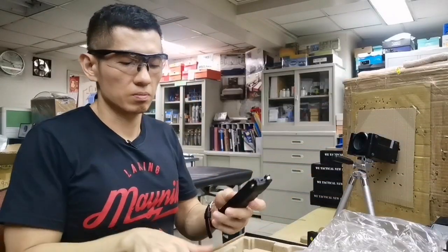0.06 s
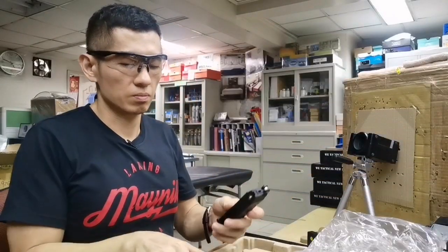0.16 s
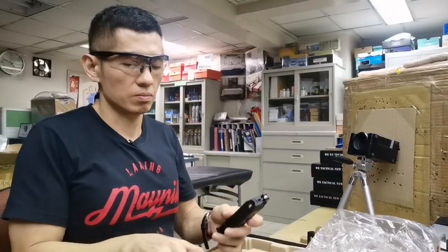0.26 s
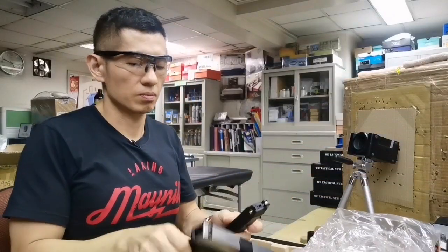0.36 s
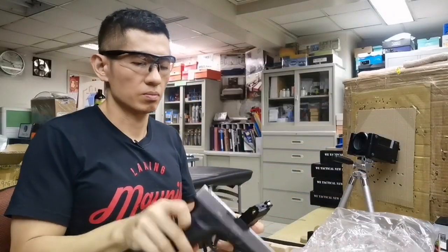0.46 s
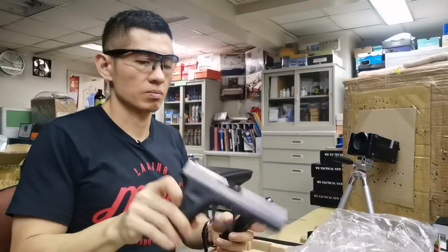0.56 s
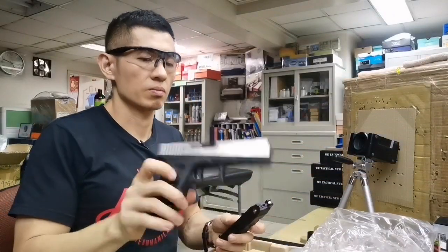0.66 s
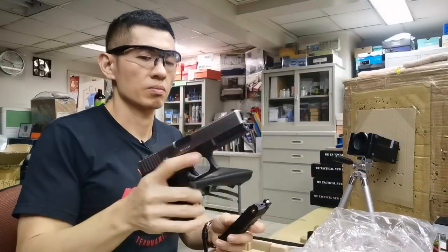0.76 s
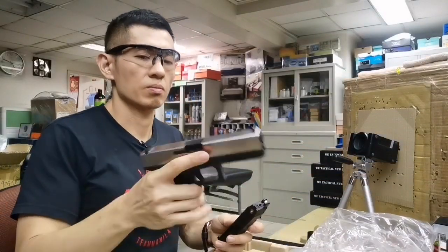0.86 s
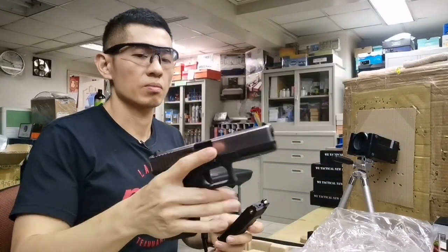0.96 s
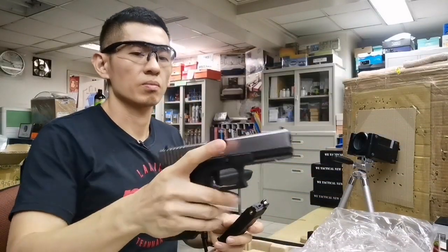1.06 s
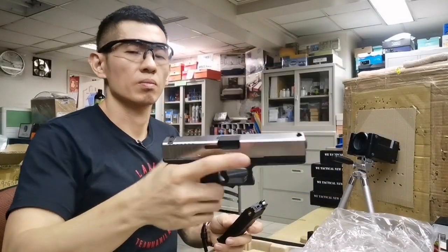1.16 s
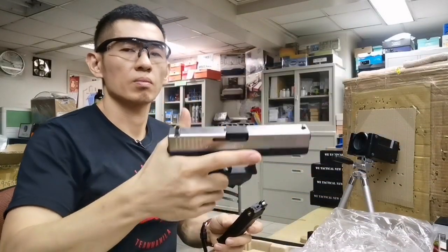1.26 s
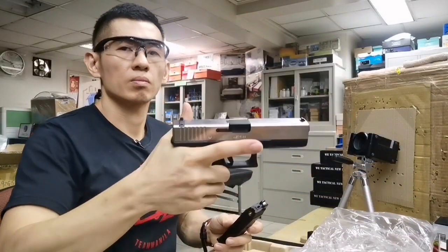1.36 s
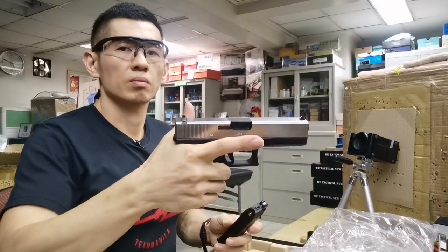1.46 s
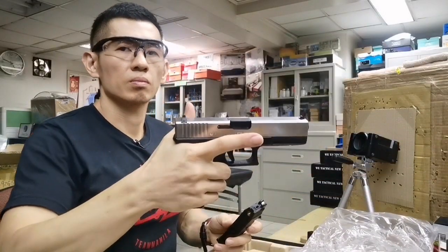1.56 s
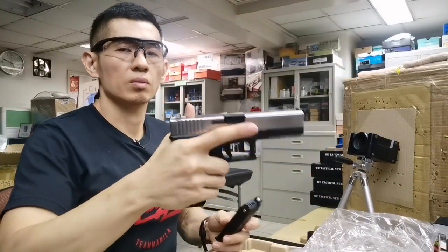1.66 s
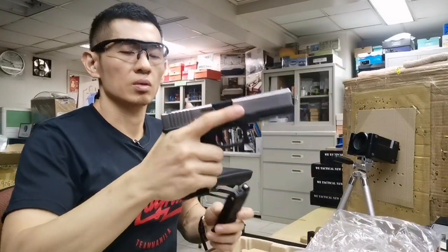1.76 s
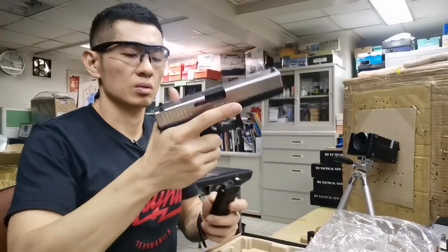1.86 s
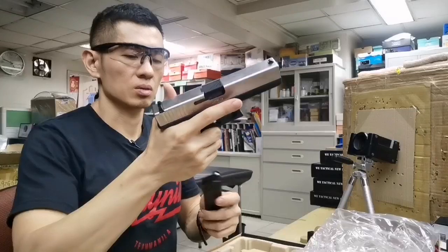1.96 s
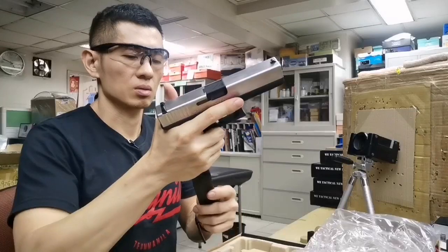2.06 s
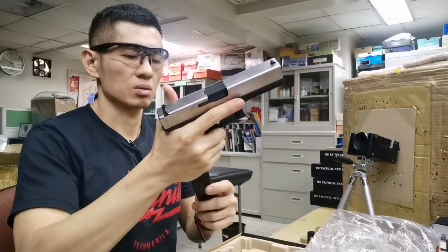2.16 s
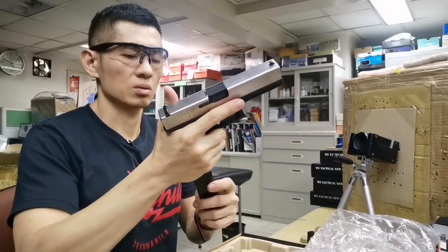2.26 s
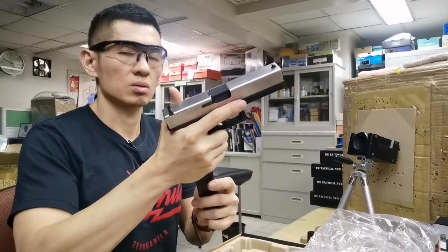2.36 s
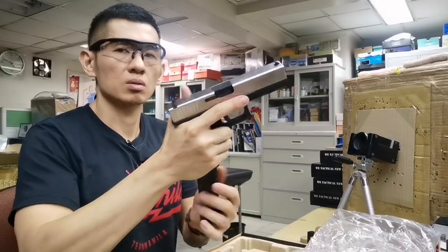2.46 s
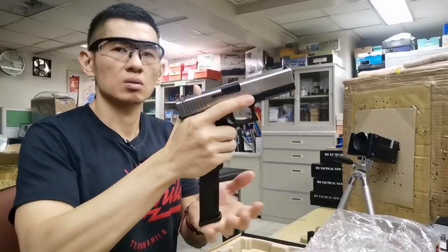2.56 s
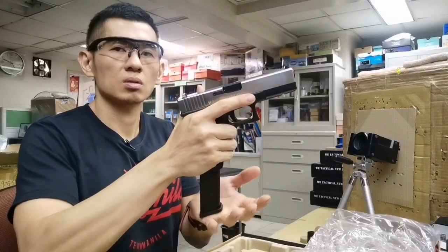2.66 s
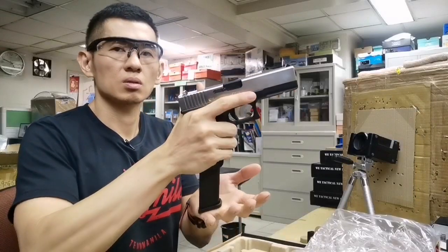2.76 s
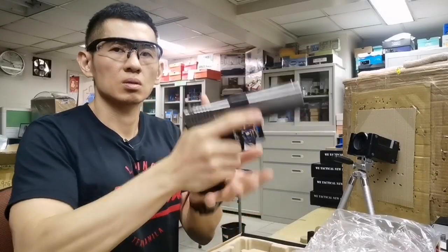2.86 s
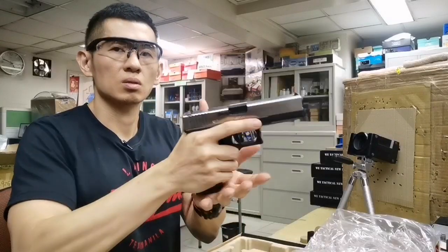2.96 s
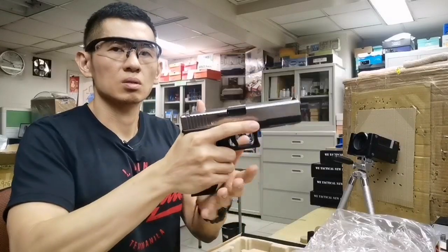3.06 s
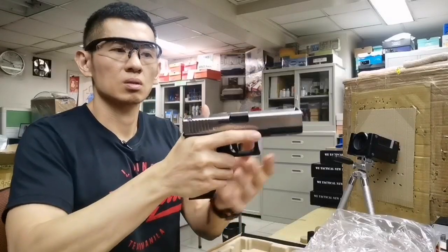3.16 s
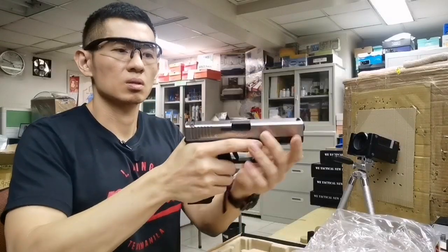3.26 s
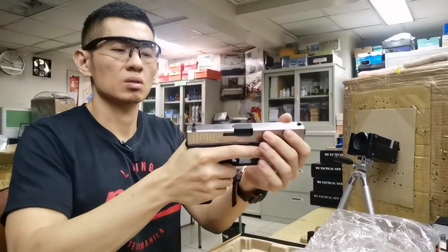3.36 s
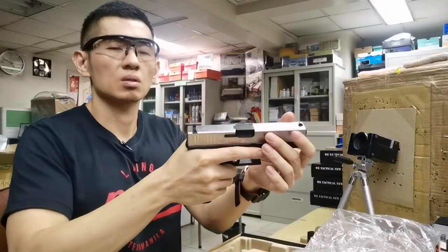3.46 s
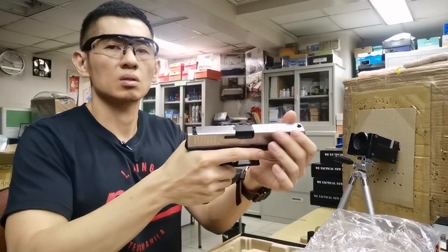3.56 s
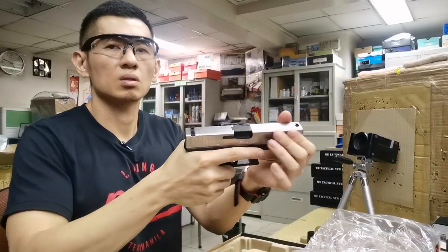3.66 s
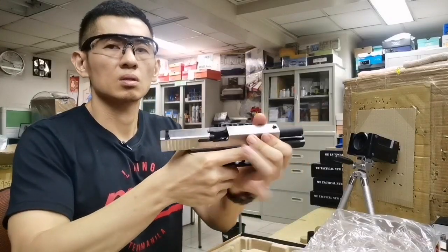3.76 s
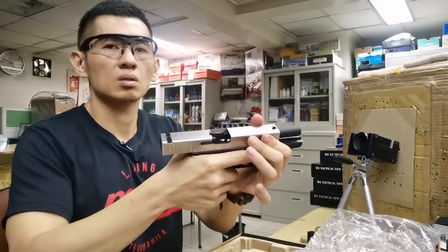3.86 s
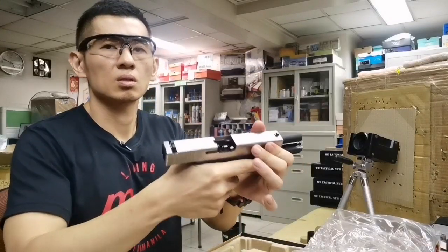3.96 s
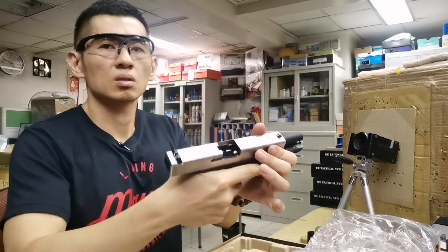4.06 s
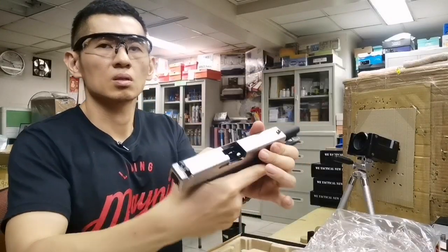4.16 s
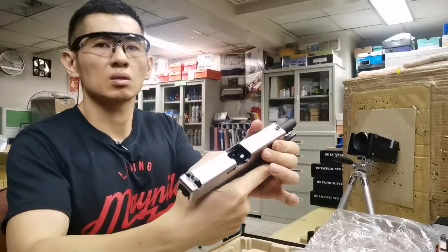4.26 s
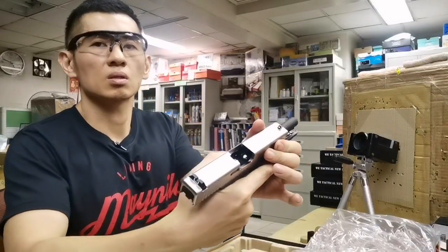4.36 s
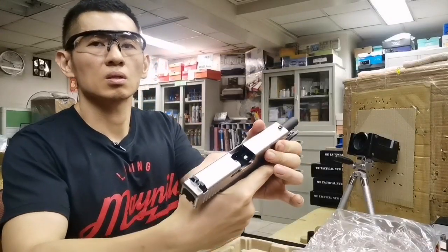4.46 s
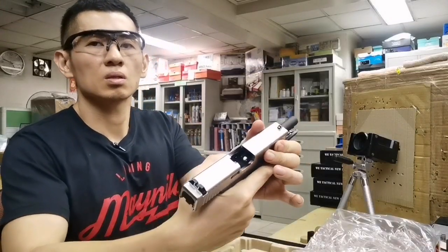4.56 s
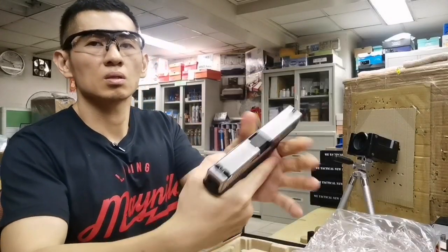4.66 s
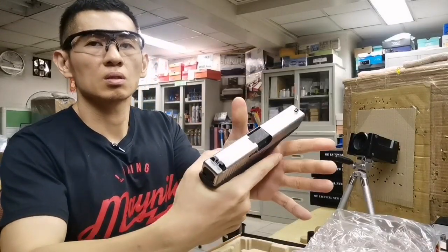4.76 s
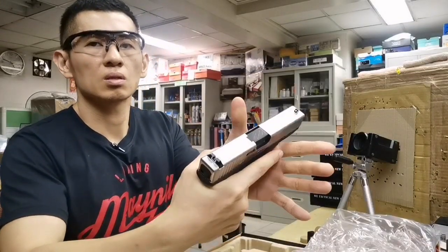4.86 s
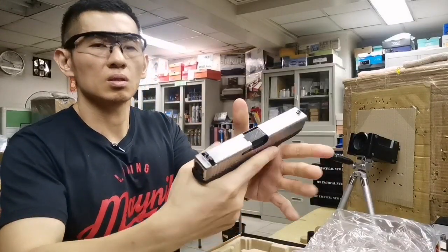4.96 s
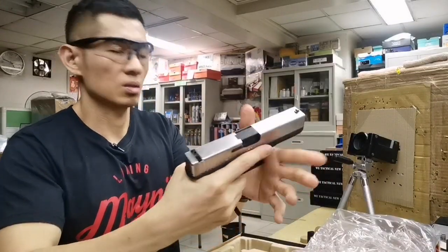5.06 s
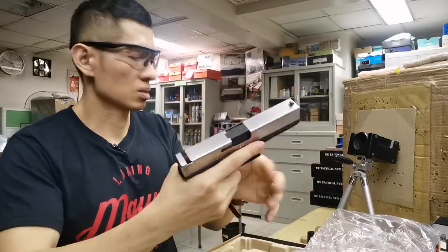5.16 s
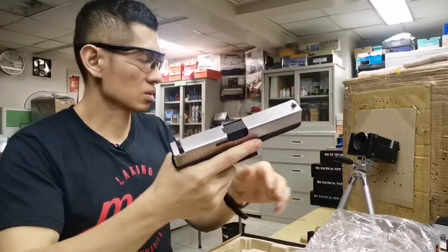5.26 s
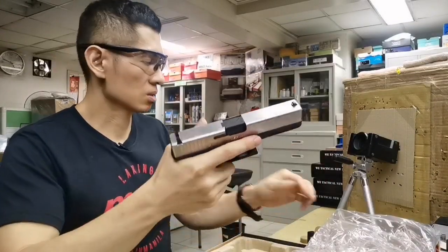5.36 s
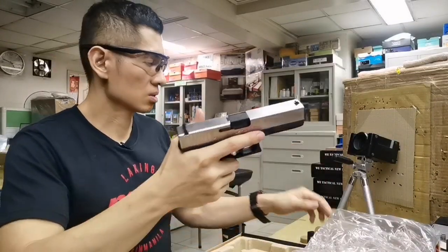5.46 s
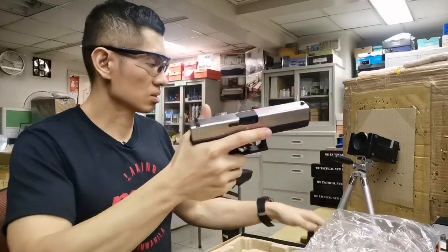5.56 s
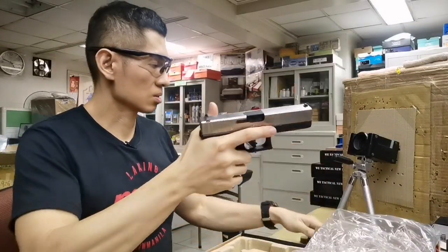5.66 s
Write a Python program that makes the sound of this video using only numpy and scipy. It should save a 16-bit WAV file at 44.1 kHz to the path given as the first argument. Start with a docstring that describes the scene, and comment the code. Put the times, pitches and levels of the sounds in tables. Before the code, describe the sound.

Short papery scuffs and taps on a card box come first, then a quick run of dry plastic clicks. A pause of faint ventilation hiss and unsteady low hum follows. Then come clicks and a loud magazine clack, a rubbing slide pull ending in a bright snap, and another tight metallic burst. The small room answers briefly; the microphone on clothing picks up rustle and soft thumps, and its level dips after loud blows.

```python
"""First a toy gas pistol drags and knocks off a card box over faint hiss and a wavering low hum.
Then a magazine is slid in and seated, and the slide is racked and released: struck modes and rubbed resonances.
A small furnished room answers through sparse decaying taps; the close clip-on microphone adds jolts,
rustling cloth (shaped noise) and short fuzzy tones.
Its gain control lowers the whole sound after loud blows and lets it creep back."""
import sys
import numpy as np
from scipy import signal
from scipy.io import wavfile
from scipy.ndimage import uniform_filter1d

SR = 44100
rng = np.random.default_rng(int(sys.argv[2]) if len(sys.argv) > 2 else 0)


def materialize(psi):
    """Save the field psi as 16-bit PCM at rate SR to the path in sys.argv[1].

    A 1-D psi becomes a single channel; in a 2-D psi each row is a channel.
    """
    bounded = np.clip(np.atleast_2d(psi).T, -1, 1)
    quanta = np.round(bounded * 32767).astype(np.int16)
    wavfile.write(sys.argv[1], SR, quanta)


N = 251414

# Modes of frame and slide, registers at full strength: (frequency [Hz], level [dB], 60 dB decay [s])
PISTOL_MODES = [(427, 2, .018), (602, 7.5, 0.026), (806, 6, 0.021), (926, -4.5, 0.0093), (1176, 5, 0.0081),
                (1510, -15, 0.033), (1700, 1.5, 0.012), (1950, -3, 0.02), (2192, 2, 0.0097),
                (2316, 0.5, 0.0073), (2728, 3, 0.0092), (3200, 8, 0.009), (3607, 0.5, 0.016),
                (4260, -4, 0.015), (4760, 1.5, 0.013), (5490, -1.5, 0.02), (6144, 4.5, 0.0076),
                (7182, 1.5, 0.01), (7600, -3, 0.028), (9070, -3, 0.019), (9830, -12.5, 0.033),
                (11900, -18, .008), (12600, -26, .008)]
# Where bass, body, middle and treble of a blow blend: (frequency [Hz])
REGISTERS_HZ = [750, 1350, 2500, 3000, 4000, 5200]
TREBLE_DB = -9  # treble under the middle
SCATTER_DB = 2.0  # chance in how strongly a blow rings each mode
TOUCH = 88  # samples of light touch before a blow
TOUCH_RISE_MS, CHATTER_MS = 0.7, 1.3  # growth and decay by a factor e


def clack(peak_db, struck_hz, bass_db, bright_db, walls_db):
    """A touch, a blow and its chatter ring the modes; summed over all directions, the peaks even out."""
    hz, db, t60 = np.transpose(PISTOL_MODES)[:, :, None]
    t = np.arange(2600) / SR
    register_db = [bass_db, 0, 0, bright_db, bright_db, bright_db + TREBLE_DB]
    db = db + np.interp(hz, REGISTERS_HZ, register_db)
    near_spot_db = 9.0 * np.exp(-(np.log(hz / struck_hz) / 0.073) ** 2)
    near_spot_db = near_spot_db + SCATTER_DB * rng.standard_normal(hz.shape)

    detuned_hz = hz * rng.uniform(.97, 1.03, hz.shape)
    turns = detuned_hz * t + rng.uniform(0, .12, hz.shape)
    build_up = (1 - np.exp(-hz * t / 0.21)) ** 2  # over about a cycle
    waves = np.sin(2 * np.pi * turns) * build_up
    ringing = (gain_of(db + near_spot_db - 60 * t / t60) * waves).sum(0)

    since_ms = (np.arange(500) - TOUCH) * 1000 / SR
    touch = .35 * np.exp(since_ms / TOUCH_RISE_MS)
    strength = np.where(since_ms < 0, touch, np.exp(-since_ms / CHATTER_MS))
    contacts = rng.standard_normal(500) * (rng.random(500) < .1) * strength
    contacts[TOUCH] = -2.0  # the blow itself
    direct = signal.fftconvolve(ringing, contacts)
    direct = gain_of(peak_db) * direct / abs(direct).max()

    outline_db = uniform_filter1d(db + .3 * near_spot_db, size=3, axis=0, mode="nearest")
    spread = coloured(signal.unit_impulse(1024), np.hstack([hz, outline_db]))
    spread = np.pad(spread / np.linalg.norm(spread), (TOUCH, 0))
    return direct, gain_of(walls_db) * np.linalg.norm(direct) * spread


# Parts of the pistol knocking, levels before the path to the microphone:
# (time [s], peak level [dB], pitch struck most [Hz], bass [dB], brightness [dB])
CLACKS = [(0.4518, -27, 2230, 4, -1.5), (0.5797, -24, 1170, -9, -15.5), (0.6283, -47, 4760, -23, -5),
          (0.6481, -36.5, 3160, -22, -7), (0.6948, -44.5, 5800, -20, -1), (0.735, -47, 3880, -22, -12),
          (0.757, -55, 6000, -22, 8), (0.8996, -18, 2320, -31, -10), (0.9111, -29, 2300, -28, -24),
          (0.916, -21.5, 2050, -22, -29), (0.9199, -18, 1550, -39, -5.5), (0.9929, -20, 1190, -29, -18.5),
          (2.4831, -23, 1890, 4, -1.5), (2.5188, -40.5, 6200, -20, -4.5), (2.5509, -17.5, 2300, -22, -12),
          (2.5609, -29.5, 2100, 2, -6), (2.6293, -13, 2100, -10, -14), (2.663, -22, 2200, 4, -11),
          (2.9485, -21, 2017, -18, -5), (2.9549, -15, 2000, -12.5, -10), (2.9828, -13.5, 1890, -9, -11.5),
          (2.9879, -15.5, 1630, -17, -2), (2.99, -9, 1570, -13.5, -11), (2.9971, -18.5, 2100, -17.5, -5.5),
          (3.0, -14.5, 2300, -24.5, 2), (2.9988, -16, 8400, -30, 1), (3.0058, -6.5, 1664, -11.5, -2.5),
          (3.0086, 0.5, 1678, -29.5, -8), (3.0158, -15.5, 1700, -15.5, -10.5), (3.8066, -43, 1930, -8, -27),
          (3.8171, -31, 2084, -9, -8.5), (3.8341, -12.5, 1930, -45, -15), (3.8371, -10, 2350, -25.5, 4),
          (3.8408, -9, 1420, -23, -5.5), (3.8673, -12.5, 2350, -34, -4), (3.8752, -14, 2050, -28, -4),
          (3.8819, -13.5, 1860, -32, -7.5), (3.8959, 2, 2360, -28, -9), (4.5242, -38.5, 1660, -17.5, -20),
          (4.7313, -33.5, 2450, -27.5, -18), (5.1782, -47.5, 2270, -9, -10),
          (4.7682, -16, 2200, -34.5, -0.5), (4.7711, -10.5, 2200, -41, 2.5),
          (4.7744, -5.5, 2200, -28, -0.5), (4.7896, -9, 1980, -38, -7), (4.7983, -5, 1950, -35, 0),
          (4.7978, -21, 6050, -28, 7), (4.8004, -4.5, 2390, -45, 1.5), (4.8044, -21.5, 1830, -11, -8)]
# Share of a blow thrown at the walls, strong around .7 to .9 s, almost none near 1 s: (time [s], level [dB])
WALLS = [(.45, -2.5), (.7, 9.5), (.9, 9.5), (.99, -38), (2.48, 3), (2.66, 2.5), (3.0, 4), (3.9, 3.5),
         (4.8, 6.5)]


def pistol_clacks():
    """All blows of the pistol: the sound straight ahead, and the sound that the walls receive."""
    ahead, around = np.zeros(N), np.zeros(N)
    for s, *blow in CLACKS:
        walls_db = np.interp(s, *np.transpose(WALLS))
        direct, spread = clack(*blow, walls_db)
        add(ahead, s - TOUCH / SR, direct)
        add(around, s - TOUCH / SR, spread)
    return ahead, around


# Resonances of the rubbed frame: (frequency [Hz], width before scaling [Hz], level in its register [dB])
RAIL = [(1350, 110, -1.5), (1723, 310, -1.5), (2130, 250, -0.5), (2468, 1300, -3.5), (2830, 250, -4),
        (4200, 1000, 3), (4480, 620, -12.5), (5700, 670, 1), (6750, 1800, 0.5), (6940, 600, -13),
        (8850, 900, -15.5)]
# Borders between low, middle and treble register of the frame: (frequency [Hz])
RAIL_SPLITS_HZ = (2750, 5000)
# Hand, magazine or slide rubbing the frame; levels of the low register before the path, others relative to it:
# (time [s], length [s], level at start [dB], level at end [dB], middle [dB], treble [dB], rasp [Hz])
RUBS = [(0.601, 0.11, -77, -75, 14.5, -15, 3110), (2.424, 0.054, -68.5, -56.5, 8, -4.5, 3860),
        (2.645, 0.16, -61, -55.5, -4, -6, 2040), (2.931, .048, -55, -41, -7, -6, 2020),
        (3.802, 0.14, -41, -42, -6, -17, 2000), (4.521, 0.058, -53.5, -56.5, -7.5, -8.5, 1930),
        (4.731, .03, -58, -56.5, -19.5, -26, 2470), (4.76, 0.028, -54, -27.5, -3, -5.5, 2270)]
RASP_WIDTH_HZ, RASP_DB = 330, 7  # the spot being rubbed sings out; width before scaling


def frame_rubs():
    """Dense friction slips ring the frame and one extra resonance at the rubbed spot."""
    track = np.zeros(N)
    for s, *stroke, rasp_hz in RUBS:
        body = RAIL + [(rasp_hz, RASP_WIDTH_HZ, RASP_DB)]
        rub = scrape(*stroke, body, RAIL_SPLITS_HZ,
                     slips_per_s=2200.0, uneven_db=2.5, lift_db_per_s=395.5)
        add(track, s, rub)
    return track


# Drags over the box; levels of the low register before the path, others relative to it:
# (time [s], length [s], level at start [dB], level at end [dB], middle [dB], treble [dB])
DRAGS = [(.133, 0.058, -38, -43, -24, -25), (0.206, .07, -56, -41.5, -9.5, -35),
         (0.282, 0.074, -39.5, -42, -7, -28), (.438, 0.033, -37, -33.5, -14.5, -49),
         (0.469, 0.032, -34, -34, -7, -25), (0.494, 0.038, -42, -23, -9.5, -28.5)]
# Borders between low, middle and treble register of the box: (frequency [Hz])
BOX_SPLITS_HZ = (1000, 3700)


def box_drags():
    """Sparser friction slips ring the card box and fade quickly as each stroke lifts."""
    track = np.zeros(N)
    for s, *stroke in DRAGS:
        drag = scrape(*stroke, BOX, BOX_SPLITS_HZ,
                      slips_per_s=550., uneven_db=2.0, lift_db_per_s=1203)
        add(track, s, drag)
    return track


# Resonances of the card box, dragged or knocked: (frequency [Hz], width before scaling [Hz], level [dB])
BOX = [(565, 214, 6.5), (789, 76, -6.5), (1195, 380, 4.5), (1447, 87, -1), (1720, 390, 4), (2040, 370, -1),
       (3010, 250, -5), (4420, 150, -1.5), (5050, 1200, -1.5), (6250, 170, -10), (7440, 1500, -6.5)]


def knock(peak_db):
    """A tap rings the box as decaying sines, the low modes most."""
    t = np.arange(2000) / SR
    ring = np.zeros(len(t))
    for hz, width, db in BOX:
        mode_db = db - 35.0 * (hz > 1000) - 20.0 * (hz > 3700)
        envelope = np.exp(-np.pi * 1.3 * width * t) * (1 - np.exp(-hz * t))
        ring += gain_of(mode_db) * envelope * np.sin(2 * np.pi * hz * t)
    return gain_of(peak_db) * ring / abs(ring).max()


# Fingers and pistol on the box, before the path to the microphone: (time [s], peak level [dB])
KNOCKS = [(.135, -31.5), (.389, -24), (.443, -35), (.526, -22.5)]


def box_knocks():
    """All taps on the card box."""
    track = np.zeros(N)
    for s, peak_db in KNOCKS:
        add(track, s, knock(peak_db))
    return track


GRIP_S = 0.0027  # a stroke bites over this time


def scrape(length, first_db, last_db, middle_db, treble_db, body, splits_hz,
           slips_per_s, uneven_db, lift_db_per_s):
    """Uneven slips of friction excite a resonant body; the touch sets how much of each register rings."""
    t = np.arange(round((length + .06) * SR)) / SR
    size = gain_of(uneven_db * np.minimum(rng.exponential(1, len(t)), 4))
    slipping = rng.random(len(t)) < slips_per_s / SR
    slips = size * rng.choice([-1., 1.], len(t)) * slipping
    registers = np.zeros((3, len(t)))
    for hz, width, db in body:
        ringing = evened(resonate(slips, hz, 0.84 * width))
        registers[np.searchsorted(splits_hz, hz)] += gain_of(db) * ringing
    tone = sum(gain_of(db) * evened(r) for db, r in zip((0, middle_db, treble_db), registers))
    stroke_db = np.interp(t, [0, length], [first_db, last_db])
    level_db = stroke_db - lift_db_per_s * np.maximum(t - length, 0)
    return tone * gain_of(level_db) * np.minimum(t / GRIP_S, 1)


# Decay of the small furnished room: (frequency [Hz], 60 dB decay before the late drop [s])
ROOM_DECAY = [(300, 0.067), (900, 0.21), (1500, 0.4), (3000, 0.42), (6000, 0.47), (12000, 0.36)]
# Strength of the room's answer, before the balance for decay time: (frequency [Hz], level [dB])
ROOM_LEVEL = [(300, -24), (700, -12), (1200, -4), (1700, -11), (2500, -16.5), (4000, -15), (7000, -17.5),
              (12000, -8)]


def room(x):
    """Sparse taps of random sign, each band dying at its own speed; the tail's end drops away fast."""
    taps = np.zeros(SR // 2)
    at = np.arange(160, len(taps) - 20, 20)
    taps[at + rng.integers(0, 20, len(at))] = rng.choice([-1., 1.], len(at))
    hz, t, z = signal.stft(taps, SR, nperseg=256)
    t60 = read(ROOM_DECAY, hz)[:, None]
    late_drop_db = 19.0 * (t / 0.29) ** 6
    level_db = read(ROOM_LEVEL, hz)[:, None] - 60 * t / t60 - late_drop_db
    z = z * gain_of(level_db) / np.sqrt(t60 * 145)  # long-lasting bands start lower
    return signal.fftconvolve(x, signal.istft(z, SR, nperseg=256)[1])[:N]


PATH = [(150, -38.5), (400, -5), (700, -1), (6000, 5.5), (8500, -6.5), (12000, -8.5), (15500, -30.5)]


def at_microphone(x):
    """The way to the capsule weakens the lows and the extreme highs."""
    return coloured(x, PATH)


def bump(peak_db, swing_hz):
    """A dull push on the capsule that swings back and dies within two cycles."""
    turns = np.arange(2500) * swing_hz / SR
    push = turns * np.exp(-turns / 0.16) * np.sin(2 * np.pi * turns)
    return -gain_of(peak_db) * push / push.max()


# Jolts and taps reaching the microphone clip: (time [s], peak level [dB], swing [Hz])
BUMPS = [(2.036, -32, 200), (2.482, -24, 437), (2.989, -27, 298), (3.008, -27.5, 249), (3.793, -37, 147),
         (5.04, -40.5, 299.3), (5.17, -30, 148.8), (5.178, -22, 476), (5.196, -32.5, 599),
         (5.449, -32.5, 34.7)]


def clip_bumps():
    """All pushes on the capsule, close and without room."""
    track = np.zeros(N)
    for s, *push in BUMPS:
        add(track, s, bump(*push))
    return track


# Cloth moving at the microphone: (time [s], level [dB])
RUSTLE = [(0, -57.5), (.6, -62), (1.15, -62), (1.45, -61), (1.6, -61.5), (2.45, -60.5), (2.7, -52.5),
          (3.15, -68), (3.46, -62), (3.6, -68), (3.85, -55), (4.1, -83), (4.25, -56.5), (4.4, -57.5),
          (4.55, -61.5), (4.95, -83), (5.05, -60.5), (5.2, -48), (5.4, -60), (5.7, -63.5)]
# Spectral shape of the cloth: (frequency [Hz], relative density [dB per Hz])
CLOTH = [(12, -31), (20, -16), (65, -29), (398, 2), (672, 3.5), (857, 4.5), (1850, -30.5), (2500, -35),
         (3250, -66.5), (5500, -120)]


def cloth():
    """Patchy, mostly low noise whose level follows the movement of the cloth."""
    level_db = np.interp(np.arange(N) / SR, *np.transpose(RUSTLE))
    return gain_of(level_db) * noise(CLOTH, patchy_db=5.0, flicker_db=1.5)


# Level and pitch of the wavering low hum where it swells:
# (time of middle [s], half length [s], rms level at middle [dB], pitch [Hz])
HUM_SWELLS = [(0.167, .04, -37.5, 57), (0.259, .03, -47, 51.3), (0.447, .045, -47.5, 49.5),
              (0.646, .035, -52.5, 53.6), (.805, .045, -45, 54), (.975, .045, -53.5, 51.4),
              (1.289, .065, -39.5, 56.7), (1.495, .04, -51, 57), (1.671, .03, -51, 54),
              (1.803, .04, -59, 50.5), (1.978, .06, -41, 53.2), (2.199, .045, -45.5, 54.3),
              (2.421, .045, -40.5, 58), (2.681, 0.05, -56, 54.5), (2.963, .06, -48.5, 49.5),
              (3.11, .05, -49, 55.5), (3.302, 0.052, -50, 53), (3.419, .05, -50.5, 54),
              (3.766, .06, -46, 53.1), (4.261, .06, -52.5, 52.8), (4.479, 0.05, -60, 54),
              (4.705, .05, -57, 54.5), (4.928, .05, -63, 56), (5.122, 0.038, -48, 58),
              (5.21, .045, -46, 53.2), (5.348, 0.042, -51.5, 52), (5.563, 0.045, -41.5, 56)]
HUM_HZ, HUM_WIDTH_HZ, HUM_DB = 54.1, 14, -66.5  # width of one of the two resonance passes


def hum():
    """One wavering low hum: narrow low noise, with its swells given by level and pitch."""
    t = np.arange(N) / SR
    narrow_noise = gain_of(HUM_DB) * evened(resonate(rng.standard_normal(N), HUM_HZ, HUM_WIDTH_HZ))
    swelling = sum(swell(t, *row) for row in HUM_SWELLS).real
    return narrow_noise + np.sqrt(2) * swelling  # root two turns rms into peak


# A faint fuzzy tone that comes and goes: (time of middle [s], half length [s], level at middle [dB], pitch [Hz])
FUZZ = [(3.48, 0.077, -54.5, 838), (4.3, 0.14, -61, 926), (5.385, 0.065, -54, 783),
        (5.585, 0.037, -56, 798)]


def fuzz():
    """Slow random wobble smears the swelling tones into narrow noise."""
    t = np.arange(N) / SR
    pole = np.exp(-np.pi * 60. / SR)  # 60 Hz wide
    wobble = evened(signal.lfilter([1], [1, -pole], rng.standard_normal((2, N))))
    tones = sum(swell(t, *row) for row in FUZZ)
    return ((wobble[0] + 1j * wobble[1]) * tones).real


# Spectral shape of the ventilation hiss: (frequency [Hz], relative density [dB per Hz])
HISS = [(12, -20), (20, 6), (55, -7.5), (97, -9), (226, -11), (511, -19.5), (930, -14.5), (1790, -15.5),
        (1940, -16), (2760, -22), (3170, -24), (8440, -50.5), (13400, -64)]
HISS_DB = -56


def ventilation_hiss():
    """Continuous shaped noise with slight drift and flicker."""
    return gain_of(HISS_DB) * noise(HISS, patchy_db=2.22, flicker_db=0.8)


# Faint motor tone: (frequency [Hz], level [dB])
WHINE = [(1938, -70.5)]


def motor_whine():
    """Noise through a very narrow resonance gives an unsteady tone."""
    return sum(gain_of(db) * evened(resonate(rng.standard_normal(N), hz, 14.0)) for hz, db in WHINE)


SWELL_END_DB = -9  # level of a swell half a length from its middle


def swell(t, middle, half, peak_db, hz):
    """A complex rotating pointer whose level rises and falls smoothly around its middle."""
    level_db = peak_db + SWELL_END_DB * ((t - middle) / half) ** 2
    return gain_of(level_db) * np.exp(2j * np.pi * hz * (t - middle))


def noise(spectrum, patchy_db, flicker_db):
    """Random short-time spectra with drifting patches and wide-band flicker, at rms 1."""
    frames, hz = N // 256 + 5, np.fft.rfftfreq(1024, 1 / SR)
    a, b, patches = rng.standard_normal((frames, 513, 3)).T
    patches = uniform_filter1d(patches, 10, 0)  # over frequency
    patches = evened(uniform_filter1d(patches, 14, 1))  # over time
    flicker = evened(uniform_filter1d(rng.standard_normal(frames), 3))
    level_db = read(spectrum, hz)[:, None] + patchy_db * patches + flicker_db * flicker
    z = (a + 1j * b) * gain_of(level_db)
    return evened(signal.istft(z, nperseg=1024, noverlap=768)[1][:N])


def resonate(x, hz, width):
    """A two-pole resonance applied twice, for steep skirts."""
    b, a = signal.iirpeak(hz, hz / max(width, 5), SR)
    return signal.lfilter(b, a, signal.lfilter(b, a, x))


def coloured(x, spectrum):
    """Causal filter: the phase follows from the log gain."""
    hz = abs(np.fft.fftfreq(4096, 1 / SR))
    log_gain = np.log(gain_of(read(spectrum, hz)))
    taps = np.fft.ifft(np.exp(np.conj(signal.hilbert(log_gain)))).real[:2048]
    return signal.oaconvolve(x, taps)[:len(x)]


def gain_of(db):
    """Decibels to amplitude."""
    return 10 ** (np.asarray(db) / 20)


def evened(x):
    """Scales to rms 1."""
    return x / np.sqrt(np.mean(x ** 2) + 1e-20)


def read(points, hz):
    """Value of a spectrum table on a log-frequency axis."""
    f, value = np.transpose(points)
    return np.interp(np.log(hz + 1), np.log(f + 1), value)


def add(mix, s, sound):
    """Lays a sound into the mix at time s."""
    part = mix[round(s * SR):][:len(sound)]
    part += sound[:len(part)]


def scene():
    """Pistol and box in the room; bumps and background at the microphone."""
    ahead, around = pistol_clacks()
    on_surfaces = frame_rubs() + box_drags() + box_knocks()
    in_room = ahead + on_surfaces + room(around + on_surfaces)
    background = cloth() + hum() + fuzz() + ventilation_hiss() + motor_whine()
    return (at_microphone(in_room) + clip_bumps() + background)[None]


THRESHOLD_DB, HELD_FALL_DB_PER_S = -27.0, 3.3  # of the held power that steers the gain
DUCK_SHARE = .3  # dB of gain reduction for each dB over the threshold
KNEE, HEADROOM = .75, .2  # amplitude where rounding starts, and the most it lets through above
EDGE_HZ = 15700  # upper band limit


def record(dry):
    """Gain falls some ms after a loud blow and creeps back; peaks are rounded, then band-limited."""
    power = signal.lfilter([.004], [1, -.996], dry[0] ** 2)
    power_db = 10 * np.log10(power + 1e-12)
    fall = np.arange(N) * HELD_FALL_DB_PER_S / SR
    held_db = np.maximum.accumulate(power_db + fall) - fall
    over_db = np.maximum(held_db - THRESHOLD_DB, 0)
    late_db = signal.lfilter([.001], [1, -.999], over_db)  # lags by some 23 ms
    ducked = dry / gain_of(DUCK_SHARE * late_db)
    over = np.maximum(abs(ducked) - KNEE, 0)
    rounded = ducked - np.sign(ducked) * (over - HEADROOM * np.tanh(over / HEADROOM))
    band_limit = signal.firwin(511, EDGE_HZ, window=("kaiser", 9), fs=SR)
    return signal.oaconvolve(rounded, band_limit[None], "same")


dry = scene()
out = record(dry)
materialize(out)
```